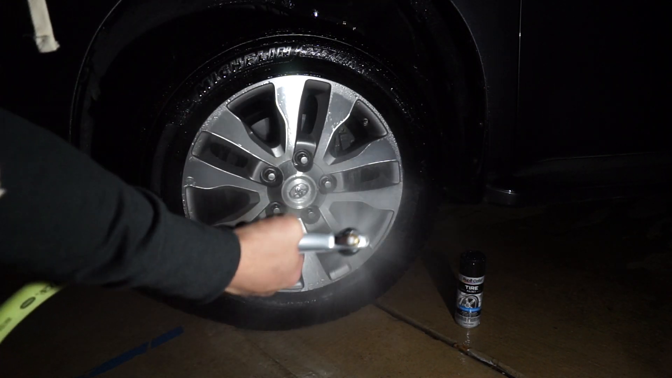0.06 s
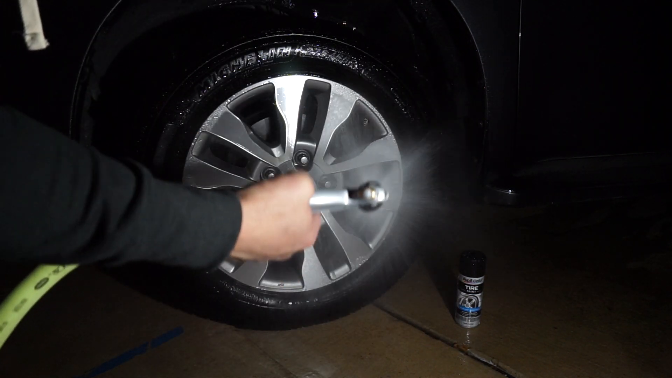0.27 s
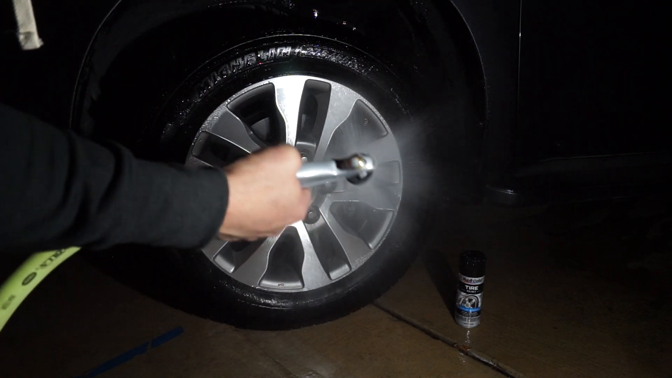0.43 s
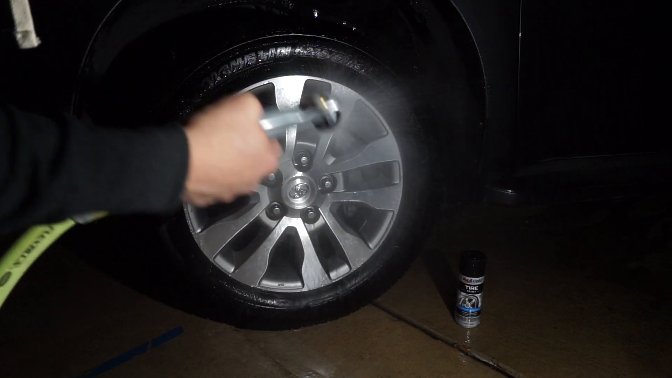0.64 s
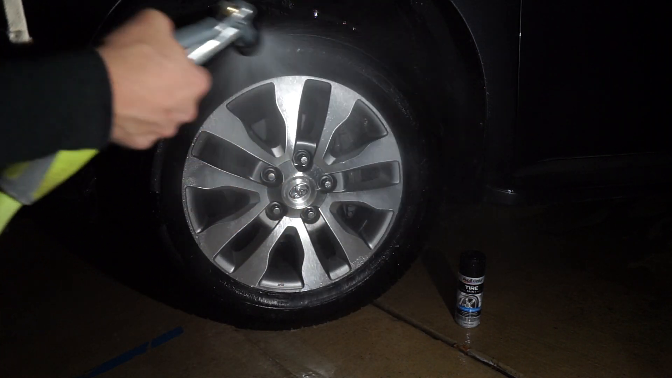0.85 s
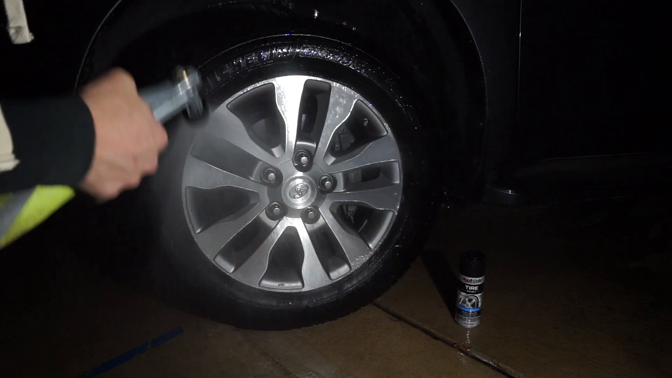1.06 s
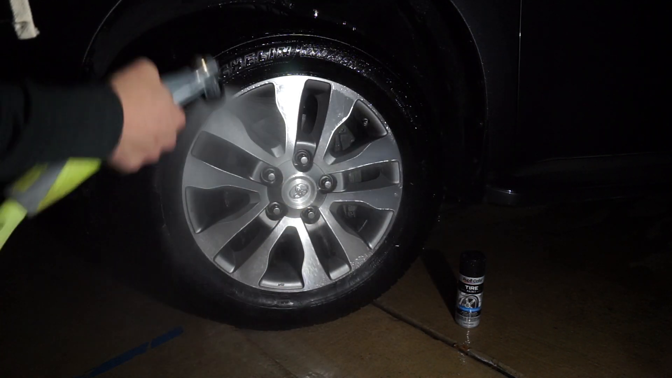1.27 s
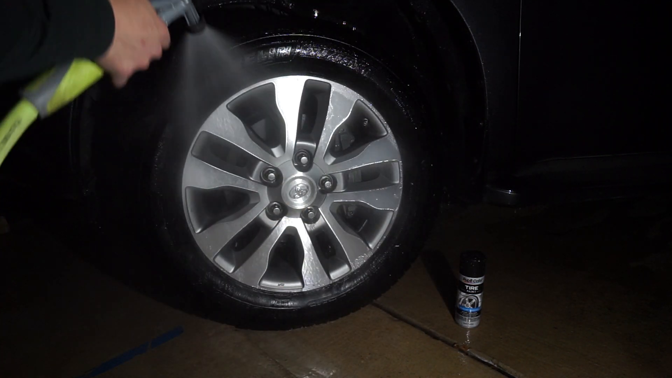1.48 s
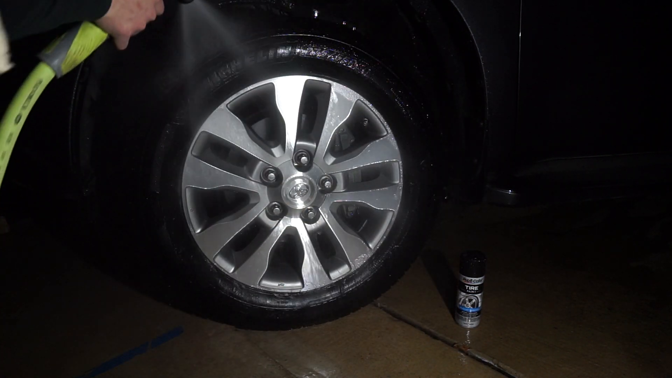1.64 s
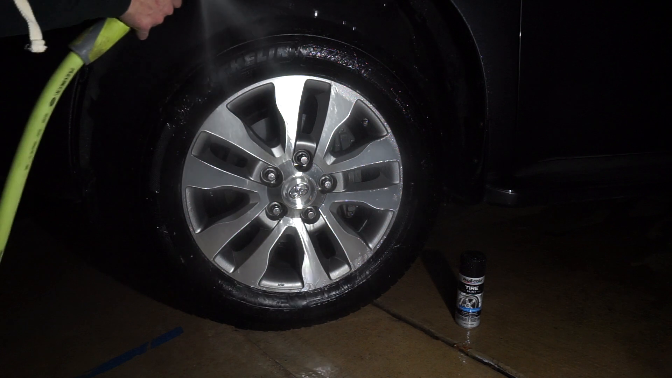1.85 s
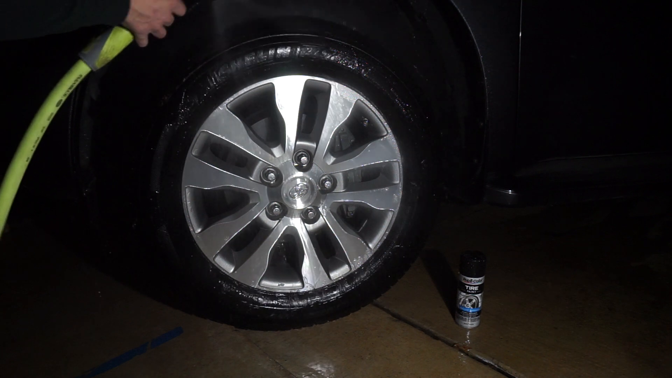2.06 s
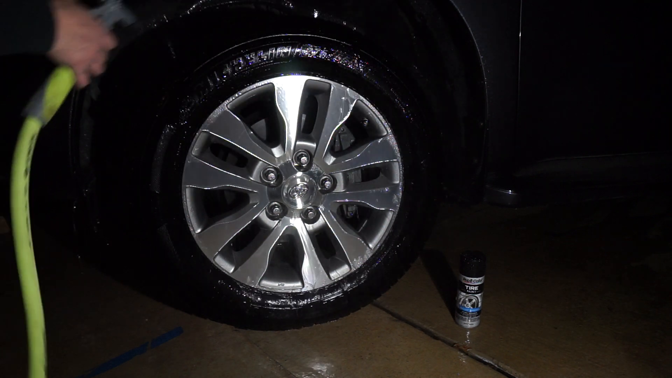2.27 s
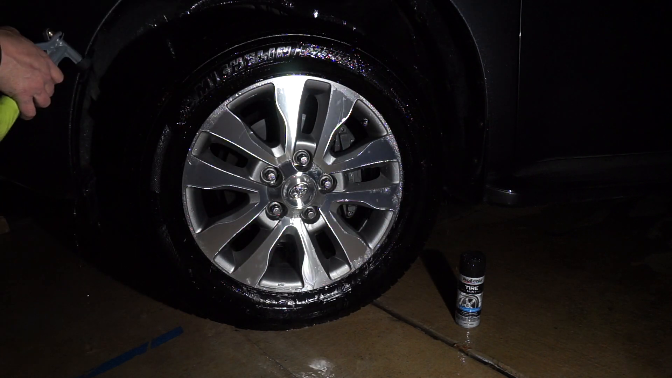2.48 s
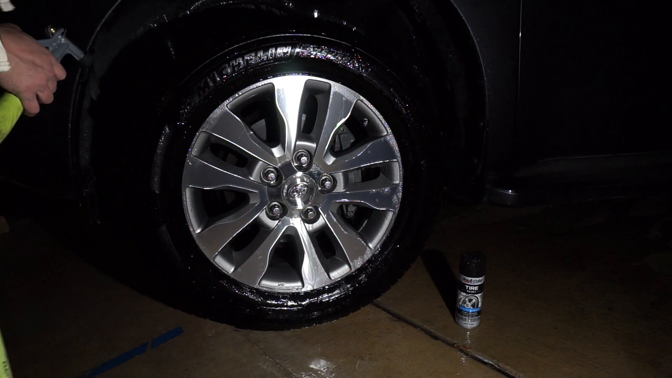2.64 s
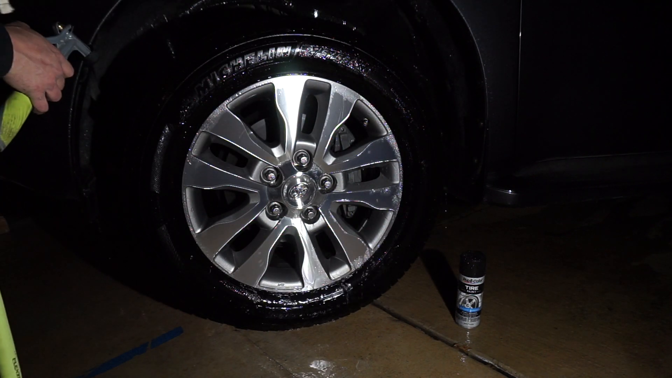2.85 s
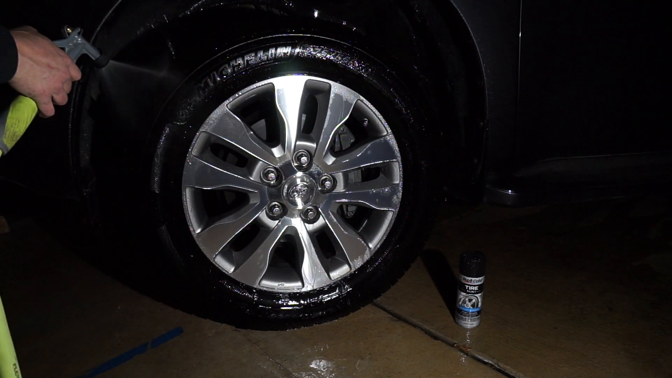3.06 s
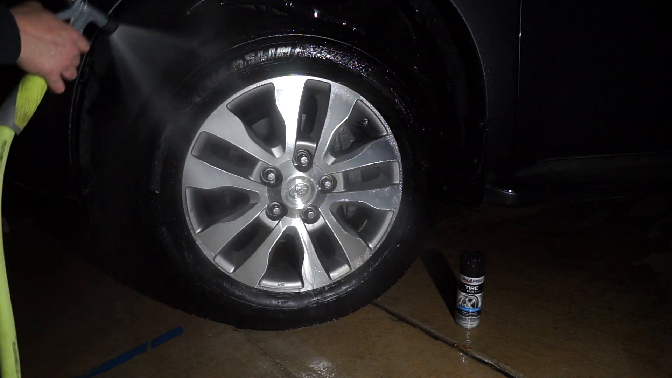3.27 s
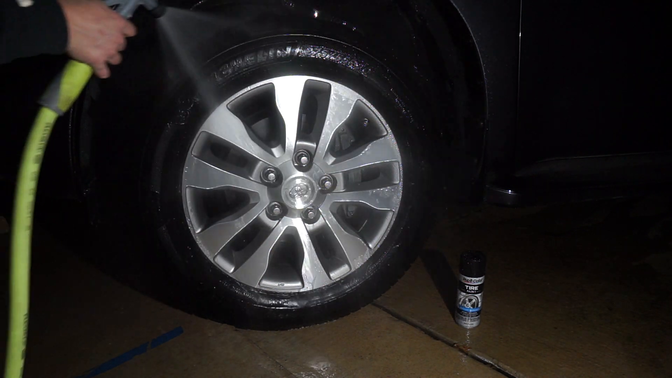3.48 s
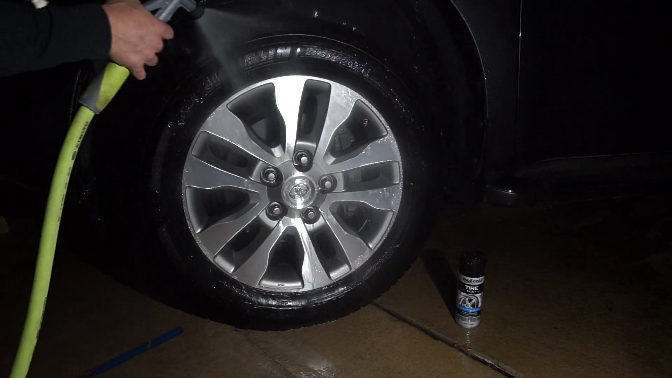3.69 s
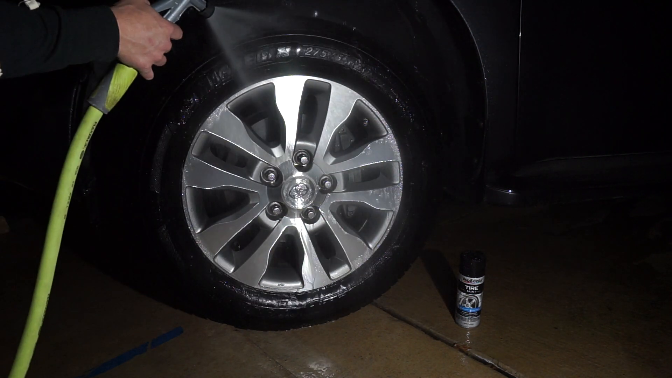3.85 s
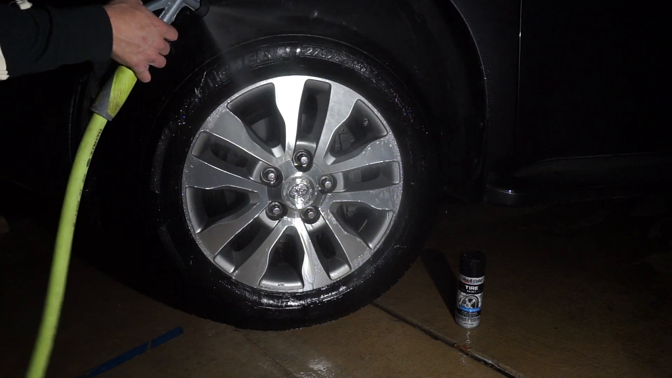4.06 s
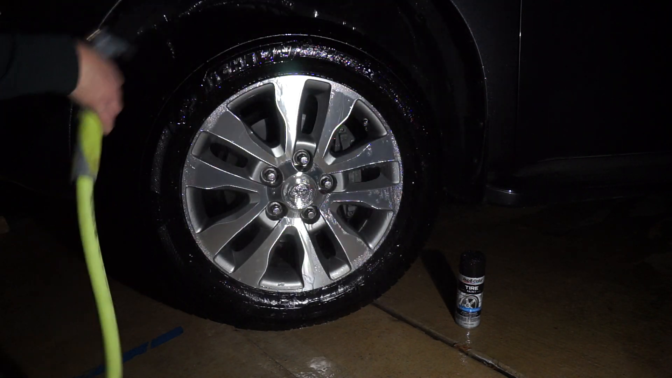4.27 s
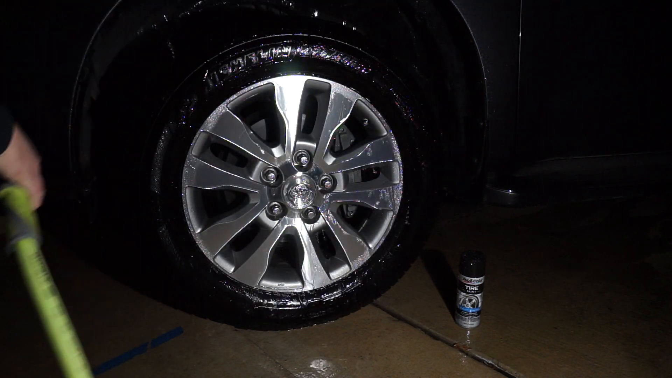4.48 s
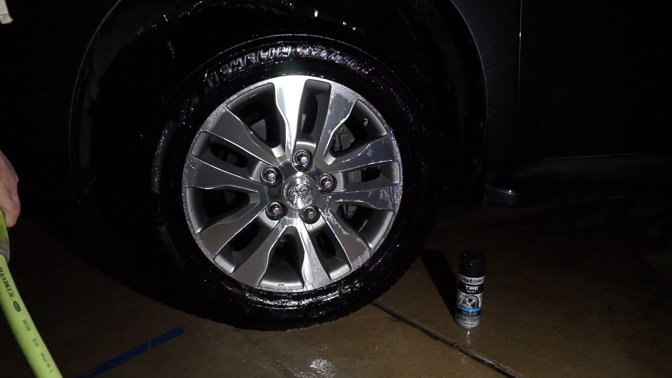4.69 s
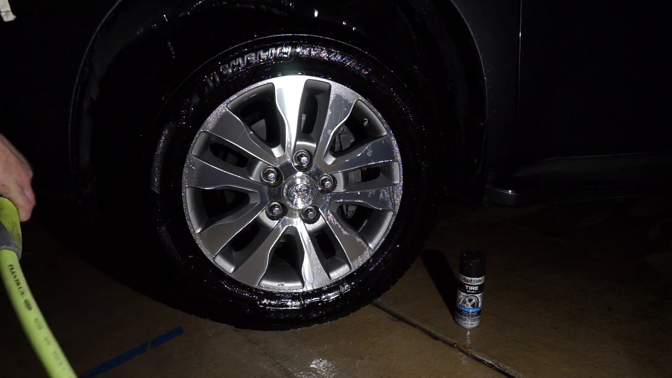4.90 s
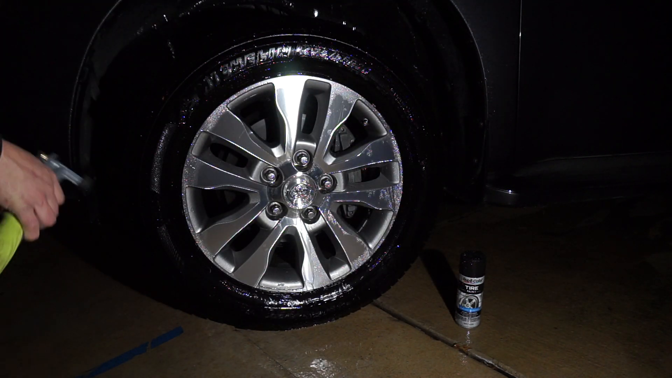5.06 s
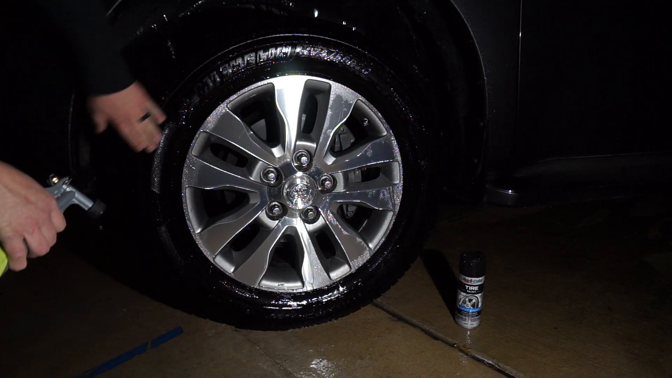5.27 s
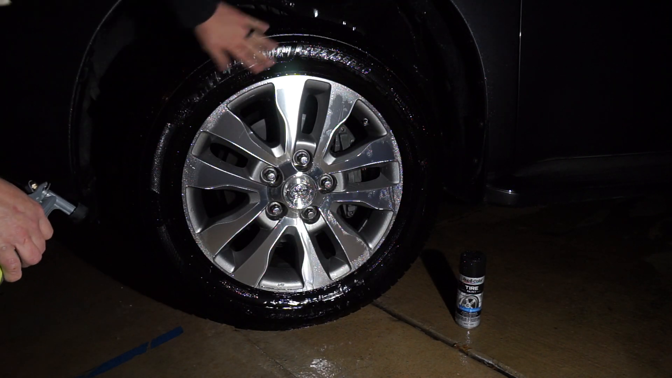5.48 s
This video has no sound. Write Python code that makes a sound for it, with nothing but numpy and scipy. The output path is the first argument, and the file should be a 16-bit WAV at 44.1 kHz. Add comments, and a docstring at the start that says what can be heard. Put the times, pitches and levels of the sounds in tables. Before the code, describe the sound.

In an echoing garage with a low hum, water hisses from a hose nozzle close to the microphone and patters against an alloy wheel for about two seconds. It cuts off, leaving small pops, ticks and drips. After a light trigger click, the spray returns for about a second, drumming on the tyre with a wavering ring from the wheel arch. Water drips again, and a sleeve gives a brief, zipping swish.

```python
"""In an echoing garage with a low hum, a hose nozzle already sprays a car wheel: broadband turbulence
hisses, and random droplet impacts patter on the alloy rim and excite the modes of its hollow and spokes.
The jet stops; water runs off, bubble pops and bright ticks ring briefly, drips chirp upward on wet concrete.
The trigger clicks; a second spray drums on the tyre and rings the wheel arch in a nearly pure tone.
Water drips again, and at the end a sleeve swishes as friction grains and a zip of weave ribs."""
import sys
import numpy as np
from scipy import signal
from scipy.fft import rfft, irfft, next_fast_len
from scipy.io import wavfile

SR = 44100
rng = np.random.default_rng(int(sys.argv[2]) if len(sys.argv) > 2 else 0)


def materialize(psi):
    """Save the field psi as 16-bit PCM at rate SR to the path in sys.argv[1].

    A 1-D psi becomes a single channel; in a 2-D psi each row is a channel.
    """
    bounded = np.clip(np.atleast_2d(psi).T, -1, 1)
    quanta = np.round(bounded * 32767).astype(np.int16)
    wavfile.write(sys.argv[1], SR, quanta)


N = 243927

# trigger of the nozzle: (starts to open [s], starts to close [s], rim patter with the jet square on [dB])
SPRAYS = [(-0.2, 2.087, -24.5), (3.051, 4.093, -28.5)]


def from_db(db):
    """Amplitude gain is ten to the power of a twentieth of the decibels."""
    return 10 ** (np.asarray(db) / 20)


def pan(db):
    """A level difference, left minus right, is shared equally between the channels."""
    return from_db(db * np.array([[.5], [-.5]]))


def rms_one(x):
    """Dividing by the root mean square gives unit power."""
    return x / np.sqrt(np.mean(x ** 2) + 1e-20)


def in_time(rows):
    """Linear interpolation gives each column of a curve at every sample."""
    s, *columns = np.transpose(rows)
    return [np.interp(np.arange(N) / SR, s, column) for column in columns]


def at_hz(points, hz):
    """Interpolation on a log-frequency axis reads a table at any frequency."""
    f, value = np.transpose(points)
    return np.interp(np.log(hz + 1), np.log(f), value)


def drift(rate):
    """Interpolated random knots, rate per second, make a slow fluctuation."""
    knots = rng.standard_normal(4000)
    return np.interp(np.arange(N) / SR * rate, np.arange(len(knots)), knots)


def swell(s, db, sigma_s):
    """A Gaussian envelope raises and lowers the gain around one moment."""
    return from_db(db) * np.exp(-.5 * ((np.arange(N) / SR - s) / sigma_s) ** 2)


def delayed(x, seconds):
    """Travel time shifts a signal without changing its shape."""
    return np.interp(np.arange(N) - seconds * SR, np.arange(N), x)


def colour(x, spectrum):
    """Folding the cepstrum gives the causal minimum-phase filter of a spectrum; unit power."""
    hz = np.fft.rfftfreq(2 ** 13, 1 / SR)
    cepstrum = irfft(np.log(from_db(at_hz(spectrum, hz))))
    cepstrum[1:len(hz) - 1] *= 2
    cepstrum[len(hz):] = 0
    response = irfft(np.exp(rfft(cepstrum)))
    return rms_one(signal.oaconvolve(x, response[None], axes=1)[:, :N])


def spread(mid, side):
    """Interchannel correlation set by frequency: alike in the bass, least alike near 6 kHz."""
    # likeness of the channels: (frequency [Hz], correlation [1])
    likeness = [(100, 1), (350, 0.95), (700, 0.88), (1400, 0.72), (2900, 0.7), (3700, 0.42), (5000, 0.21),
                (6200, 0.14), (7200, 0.42), (8500, 0.75), (15000, 0.57)]
    size = next_fast_len(len(mid))
    alike = np.clip(at_hz(likeness, np.fft.rfftfreq(size, 1 / SR)), -.99, .995)
    common = np.sqrt(1 + alike) * rfft(mid, size)
    opposed = np.sqrt(1 - alike) * rfft(side, size) * [[1], [-1]]
    return irfft(common + opposed, size)[:, :len(mid)] / np.sqrt(2)


def droplets(per_s, size_db, clump_db, clump_rate):
    """Random impulses are impacts of uneven size, in clumps, each at its own place; unit power."""
    hits = (rng.random(N) < per_s / SR) * rng.choice([-1, 1], N)
    sizes = size_db * np.clip(rng.standard_normal(N), -2, 2)
    hits = hits * from_db(sizes + clump_db * drift(clump_rate))
    return rms_one(spread(hits, hits * rng.standard_normal(N)))


def resonate(x, modes):
    """Modal superposition: parallel two-pole resonances of alternating sign; unit power."""
    out = 0
    for k, (hz, width, db) in enumerate(modes):
        r = np.exp(-np.pi * width / SR)
        poles = [1, -2 * r * np.cos(2 * np.pi * hz / SR), r * r]
        mode = (1 - r * r) * signal.lfilter([1, 0, -1], poles, x)
        out = out + (-1) ** k * from_db(db) * mode
    return rms_one(out)


def hum(level_db=-52.5):
    """Stationary coloured noise fills the garage as a steady low rumble."""
    # spectrum: (frequency [Hz], level per Hz [dB])
    rumble = [(20, -29), (45, -13), (70, -8), (100, -4.5), (125, 0.5), (175, -2), (230, -8), (310, -6),
              (420, -13.5), (750, -16.5), (1000, -18), (1500, -24), (3000, -31), (6000, -42), (16000, -35)]
    return from_db(level_db) * colour(spread(*rng.standard_normal((2, N))), rumble)


def garage(x, first_echo_s=0.0045):
    """Diffuse reverberation off concrete: dense echoes decay exponentially, the top treble fastest."""
    # reverberation: (frequency [Hz], time to fall by 60 dB [s])
    decay = [(125, 0.83), (500, 0.93), (2000, 0.51), (5000, 0.69), (10000, 0.36), (16000, 0.26)]
    hz, t, cells = signal.stft(spread(*rng.standard_normal((2, SR))), SR)
    t60 = at_hz(decay, hz)[:, None]
    tail = signal.istft(cells * from_db(-60 * t / t60), SR)[1]
    # the echoes fade in around the first one
    tail = tail * np.clip(np.arange(tail.shape[1]) / SR / first_echo_s - .5, 0, 1)
    tail /= np.sqrt(np.sum(tail ** 2) / 2)
    return signal.fftconvolve(x.mean(axis=0)[None], tail, axes=1)[:, :N]


def wandering(x, wander_s=0.0007, rate=5.0):
    """A changing path length varies the delay to the walls as the hand moves."""
    read = np.arange(N) - wander_s * SR * drift(rate)
    return x[:, np.clip(read, 0, N - 1).astype(int)]


def handling():
    """Friction as random grains: shoe and hand scuffs and a sleeve's swish under short swells."""
    # sleeve spectrum: (frequency [Hz], level per Hz [dB])
    sleeve = [(590, -46), (1000, -21), (1200, -15), (1890, -12), (2310, -14), (2500, -11), (2910, -21),
              (3380, -5), (4210, -13), (5440, -7.5), (7700, -20), (11300, -5), (16000, -13)]
    # the arm reaches for the tyre: (time [s], level [dB], bell sigma [s])
    swishes = [(5.43, -51, 0.04), (5.468, -37, 0.03), (5.53, -40, 0.007)]
    # shoes and hand: (time [s], level [dB], bell sigma [s], frequency [Hz], width [Hz], pitch glide [1/s])
    scuffs = [(2.637, -50, 0.011, 880, 700, 0.5), (2.666, -50, 0.011, 730, 600, 0),
              (2.723, -56, 0.043, 850, 1100, 1), (4.392, -44, 0.016, 120, 50, -5),
              (5.253, -57, 0.01, 960, 400, -4), (5.113, -63, 0.028, 2030, 500, 3.5),
              (5.424, -49, 0.0065, 1590, 300, -1), (5.527, -37.5, 0.0045, 2480, 300, -1)]
    t = np.arange(N) / SR
    grains = droplets(9000, size_db=2.0, clump_db=3.0, clump_rate=200)
    grit = droplets(1500, size_db=2.0, clump_db=2.5, clump_rate=200)
    out = sum(swell(*swish) for swish in swishes) * colour(grains, sleeve) * pan(4)
    for s, db, sigma_s, hz, width, glide in scuffs:
        mode = [(hz, width, 0)]
        rub = resonate(resonate(grit, mode), mode)
        # a quadratic time warp makes the pitch glide
        warped_t = t + glide * (t - s) ** 2 / 2
        out += swell(s, db, sigma_s) * [np.interp(warped_t, t, channel) for channel in rub]
    return out


def weave(rough=0.03, jitter_rate=500, flicker_db=3.0, flicker_rate=110):
    """Periodic friction: ribs of the sleeve rub in a rough, flickering zip that follows the arm's speed."""
    # passing ribs: (time [s], rib rate [1/s])
    ribs = [(5.42, 1700), (5.452, 1950), (5.468, 1850), (5.482, 1720), (5.5, 1580), (5.53, 1420)]
    # multiples of the rib rate from the first: (level [dB])
    harmonics = [-3, -1, 3, -6]
    ribs_hz, = in_time(ribs)

    def rubbing():
        turns = np.cumsum(ribs_hz * (1 + rough * drift(jitter_rate))) / SR
        return sum(from_db(db + flicker_db * drift(flicker_rate)) * np.sin(2 * np.pi * k * turns)
                   for k, db in enumerate(harmonics, 1))

    return swell(5.485, -45, 0.032) * rms_one(spread(rubbing(), rubbing()))


def short_rings(faint_db=-57, spread_db=4.0, faint_hz=2700, spread_octaves=0.44, count=110):
    """Damped oscillation, rising in pitch; faint random bubble pops lie among clear pops, ticks and a click."""
    # clear short rings: bubble pops, bright ticks of drips, and the click of the trigger at 3.074 s:
    # (time [s], level [dB], frequency [Hz])
    clear = [(2.318, -42, 4260), (2.351, -42, 2550), (2.385, -38, 13100), (2.42, -44, 2510),
             (2.458, -43, 12500), (2.488, -45, 12000), (2.54, -42, 3200), (2.553, -44, 3700),
             (2.592, -41, 10200), (2.632, -47, 3450), (2.68, -46, 2900), (2.71, -47, 2450),
             (2.738, -49, 2300), (2.756, -41, 13500), (2.777, -41, 1850), (2.859, -45, 3400),
             (2.906, -46, 2900), (3.074, -46, 1850), (4.32, -43, 8000), (4.353, -49, 2810),
             (4.389, -40.5, 12300), (4.393, -44, 7700), (4.441, -48, 2710), (4.571, -56, 1870),
             (4.589, -53, 2340), (4.591, -49, 9500), (4.628, -48, 2400), (4.789, -58, 2600),
             (4.89, -53, 3600), (4.978, -27, 10900), (4.979, -45, 2940), (5.047, -50, 3200),
             (5.193, -53, 3300)]
    fade_cycles, rise = 6, 0.026  # cycles to fade by 1/e; share by which the pitch rises meanwhile
    times = rng.uniform(0, N / SR, count)
    chance = np.clip(rng.standard_normal((count, 2)), -2, 2)
    faint_levels = faint_db + spread_db * chance[:, 0]
    faint_pitches = faint_hz * 2 ** (spread_octaves * chance[:, 1])
    out, age = np.zeros(N + SR), np.arange(SR // 20) / SR
    for s, db, hz in [*clear, *zip(times, faint_levels, faint_pitches)]:
        faded = age * hz / fade_cycles
        ring = np.sin(2 * np.pi * hz * age * (1 + rise * faded / 2))
        at = int(s * SR)
        out[at:at + len(age)] += from_db(db) * np.exp(-faded) * ring
    return np.array([out[:N], out[:N]])


def runoff():
    """Sparse random impacts crackle as water drains, strongest just after each spray."""
    # spectrum: (frequency [Hz], level per Hz [dB])
    crackle = [(300, -20), (700, -7.5), (1200, -1.5), (1900, -3.5), (2600, -5.5), (4000, -12.5),
               (6500, -13.5), (10000, -12.5), (13500, -5.5), (16000, -19)]
    # puddle resonances: (frequency [Hz], width [Hz], level [dB])
    puddle_modes = [(770, 150, -5.5), (1014, 106, -1.5)]
    gush_db, gush_fall_db_per_s, trickle_db, puddle_db = -43.5, 75, -70, -68.5
    t = np.arange(N) / SR
    gush = sum((t > closes) * from_db(gush_db - gush_fall_db_per_s * np.abs(t - closes))
               for _, closes, _ in SPRAYS)
    dribble = swell(2.68, -64.5, 0.096)  # a pocket of water empties late
    water = gush + from_db(trickle_db) + dribble
    # the trickle patters into a puddle
    plops = droplets(70, size_db=2.5, clump_db=5.5, clump_rate=14)
    puddle = from_db(puddle_db) * resonate(plops, puddle_modes)
    return water * colour(droplets(110, size_db=6.0, clump_db=2.0, clump_rate=43), crackle) + puddle


def drips(spatter_db=1.0, plip_db=-4.5, bend=1.35, grain_db=6.5):
    """A rising chirp convolved with decaying noise: each plip is followed by an uneven spatter."""
    # drips on the wet floor: (time [s], level [dB], start frequency [Hz], end frequency [Hz],
    # plip length [s], left minus right [dB], spatter fade by 1/e [s])
    falls = [(2.504, -40.5, 2480, 13100, 0.0025, 1, .004), (2.773, -43, 1500, 5540, 0.0013, 2, 0.0045),
             (2.856, -41.5, 2180, 10300, 0.0057, -2, 0.0082), (2.876, -58, 4230, 10100, 0.0036, -5, .012),
             (2.901, -43, 2000, 10400, 0.0039, 1, .01), (4.476, -45, 7200, 15200, 0.00084, 3, .012),
             (4.707, -46.5, 2980, 13950, 0.003, 8, 0.017), (4.767, -46, 5950, 15000, 0.0013, 2, .006),
             (4.932, -44, 7000, 15000, 0.0012, 4, .006), (4.976, -31, 2240, 15600, 0.0013, -4, 0.0055),
             (5.123, -42.5, 7000, 12000, 0.0015, 6, 0.0046), (5.18, -48, 9000, 14000, .002, 0, .012),
             (5.273, -48, 6000, 15500, .001, 0, 0.0093), (5.308, -41.5, 2200, 11500, 0.004, 2, .006),
             (5.348, -52, 9000, 14500, .001, 0, .004)]
    out, after = np.zeros((2, N)), np.arange(SR // 12) / SR
    for s, db, start_hz, end_hz, length, pan_db, fade_s in falls:
        age = np.arange(int(length * SR)) / SR
        hz = start_hz + (end_hz - start_hz) * (age / length) ** bend
        plip = np.sin(2 * np.pi * np.cumsum(hz) / SR) * signal.windows.tukey(len(age), .25)
        grains = from_db(grain_db * np.minimum(rng.exponential(1, len(after)), 5))
        sizes = np.exp(-after / fade_s) * grains
        spatter = spread(*rng.standard_normal((2, len(after))) * sizes)
        spatter = spatter * from_db(spatter_db) / np.linalg.norm(sizes)
        spatter[:, 0] += from_db(plip_db)  # the plip itself comes first
        splash = signal.fftconvolve(plip[None], spatter, axes=1)
        at = int(s * SR)
        out[:, at:at + splash.shape[1]] += from_db(db) * pan(pan_db) * splash
    return out


def drone(wander=0.0042, wander_rate=8, flutter_db=2.5, flutter_rate=30):
    """Sustained excitation: the jet keeps the arch's main mode ringing in a nearly pure, swaying tone."""
    # ringing of the main mode: (time [s], level [dB])
    arch_ring = [(3.37, -56), (3.38, -63), (3.45, -36), (3.52, -46), (3.564, -32), (3.634, -41),
                 (3.68, -27), (3.71, -47), (3.842, -30.5), (3.882, -44), (3.968, -30.5), (3.994, -44),
                 (4.164, -37), (4.27, -59)]
    mode_hz = 351
    s, db = np.transpose(arch_ring)
    level_db = np.interp(np.arange(N) / SR, s, db, left=-200, right=-200)
    turns = np.cumsum(mode_hz * (1 + wander * drift(wander_rate))) / SR
    tone = np.sqrt(2) * np.sin(2 * np.pi * turns)
    return tone * from_db(level_db + flutter_db * drift(flutter_rate)) * pan(3.5)


def valve(opens, closes):
    """Valve law: the flow of one spray grows with the square of the valve's travel."""
    t = np.arange(N) / SR
    open_s, close_s = 0.092, 0.078  # travel times
    travel = np.minimum((t - opens) / open_s, 1 - (t - closes) / close_s)
    return np.clip(travel, 0, 1) ** 2


def tyre_and_arch(drumming):
    """Impact excitation: heavy drops drum on the tyre and ring the arch's modes; returns both."""
    # strike of the jet on the tyre: (time [s], level [dB])
    strike = [(0.02, -49), (2.03, -50), (2.06, -53), (3.2, -83), (3.398, -57), (3.43, -38), (3.462, -36),
              (3.512, -41.5), (3.578, -32.5), (3.976, -33), (3.996, -44), (4.11, -34.5), (4.2, -39),
              (4.27, -58)]
    # tyre spectrum: (frequency [Hz], level per Hz [dB])
    tyre_spectrum = [(20, -51), (35, -10), (50, -10), (75, -10), (125, -4), (190, -0.5), (255, 4.5),
                     (315, -1), (390, -2), (460, -1.5), (700, -9), (1200, -4.5), (3000, -34.5)]
    # arch resonances: (frequency [Hz], width [Hz], level [dB])
    arch_modes = [(258, 52, -1.5), (285, 7.3, 5), (571, 31, 0.5), (661, 15, -7)]
    square_db, arch_follows = -41.5, 0.9  # below this strike the arch's share fades (dB per dB)
    drum_db = in_time(strike)[0]
    arch_db = drum_db + arch_follows * np.minimum(drum_db - square_db, 0)
    heavy = droplets(2500, size_db=1.5, clump_db=2.0, clump_rate=45)
    tyre = drumming * from_db(drum_db) * colour(heavy, tyre_spectrum)
    on_arch = droplets(2500, size_db=2.5, clump_db=4.0, clump_rate=30)
    arch = drumming * from_db(arch_db - 5.0) * resonate(on_arch, arch_modes)
    return tyre, arch


def rim(landing, pattering):
    """Impact excitation: drops patter on the alloy and ring the modes of its hollow and spokes."""
    # strike of the jet on the rim: (time [s], level [dB])
    strike = [(0.02, -35), (0.15, -38), (0.21, -34.5), (0.54, -33), (0.56, -38), (0.92, -39.5),
              (1.4, -33.5), (1.74, -48), (2.06, -47), (3.17, -53.5), (3.61, -33.5), (3.692, -41.5),
              (3.86, -33.5), (3.99, -44.5), (4.1, -34.5)]
    # patter spectrum: (frequency [Hz], level per Hz [dB])
    patter_spectrum = [(100, -38.5), (300, -9), (550, -5), (1100, -3.5), (1500, 0), (2000, -1), (2500, 0.5),
                       (3300, -1.5), (4200, -4), (4900, -5.5), (8000, -11.5), (15000, -34)]
    # resonances of the hollow: (frequency [Hz], width [Hz], level [dB])
    hollow_modes = [(668.4, 20, 0), (734, 50, -1.5), (853, 110, -5.5), (1057, 51, -15)]
    # resonances of the spokes: (frequency [Hz], width [Hz], level [dB])
    spoke_modes = [(2100, 560, -3), (2455, 130, 2), (3130, 150, -4.5), (3730, 400, -5), (4050, 300, -5.5)]
    # the jet sweeps over the spokes: (time [s], level [dB], bell sigma [s])
    spoke_passes = [(0.128, -31, 0.1), (0.44, -34.5, 0.17), (1.2, -41, 0.2), (1.933, -39, 0.12)]
    patter_follows, hollow_follows = 0.31, 1.8  # dB per dB of the strike
    strike_db = in_time(strike)[0] + 33  # 0 dB when the jet is square on the rim
    taps = droplets(9000, size_db=2.5, clump_db=0.7, clump_rate=150)
    patter = pattering * from_db(patter_follows * strike_db) * colour(taps, patter_spectrum)
    on_hollow = droplets(4000, size_db=5.0, clump_db=-0.5, clump_rate=29)
    hollow = landing * from_db(hollow_follows * strike_db - 33.0) * resonate(on_hollow, hollow_modes)
    on_spokes = droplets(5000, size_db=5.5, clump_db=1.5, clump_rate=35)
    passing = sum(swell(*sweep) for sweep in spoke_passes)
    spokes = landing * passing * resonate(on_spokes, spoke_modes)
    # the spokes hardly ring above 4500 Hz
    spokes = signal.sosfilt(signal.butter(6, 4500, fs=SR, output="sos"), spokes)
    return patter + hollow + spokes


def spitting(flow):
    """Intermittent flow: the nozzle spits coarse drops as it closes, and as it opens and a while after."""
    # spectrum: (frequency [Hz], level per Hz [dB])
    spit_spectrum = [(1500, -29), (3000, 4.5), (4500, 4), (7500, 6), (10000, -5), (15000, -1)]
    # spits: (time [s], level [dB], hold [s], release [dB/s])
    spits = [(2.083, -29, 0.006, 702), (3.121, -33, 0.004, 605), (3.15, -30, 0.025, 300),
             (3.234, -31, 0.11, 81)]
    attack_db_per_s = 598
    t = np.arange(N) / SR
    gain = sum(from_db(db - attack_db_per_s * np.maximum(s - t, 0) - release * np.maximum(t - s - hold, 0))
               for s, db, hold, release in spits)
    coarse = droplets(5000, size_db=3.0, clump_db=2.5, clump_rate=130)
    return np.sqrt(flow) * gain * colour(coarse, spit_spectrum)


def mist(flow, mist_db, mic_lag_s=9e-6):
    """Dense random impulses fuse into broadband hiss; a later right channel gives a time difference."""
    # spectrum: (frequency [Hz], level per Hz [dB])
    mist_spectrum = [(1500, -37), (4000, -7), (6200, -10), (8000, -4.5), (10000, 0.5), (12500, 2),
                     (14500, 1), (16000, -5)]
    fine = droplets(26000, size_db=5.0, clump_db=1.0, clump_rate=280)
    left, right = flow * from_db(mist_db + 3.0) * colour(fine, mist_spectrum)
    lag = np.exp(-2j * np.pi * np.fft.rfftfreq(N, 1 / SR) * mic_lag_s)
    return np.array([left, irfft(rfft(right) * lag, N)])


def spray(flight_s=0.0081, drum_lag_s=0.13, tyre_pan_db=1.5):
    """Time of flight: mist hisses at the nozzle, heavier drops land later on rim, tyre and arch."""
    # hiss as the hand moves the nozzle: (time [s], level [dB], left minus right [dB])
    nozzle = [(0.02, -27.5, 0.5), (0.71, -26, 1), (0.87, -24.5, 2), (1.24, -28.5, 2), (1.48, -25, 1.5),
              (1.63, -29, 4), (1.65, -26, 4), (1.81, -27.5, 2), (2.08, -23.5, 2.5), (3.15, -28, 3.5),
              (3.224, -30, 2), (3.398, -29.5, 5), (3.844, -25.5, 2), (3.998, -27, 2.5), (4.1, -24, 2)]
    mist_db, pan_db = in_time(nozzle)
    flow = sum(valve(opens, closes) for opens, closes, _ in SPRAYS)
    rim_flow = sum(from_db(db) * valve(opens, closes) for opens, closes, db in SPRAYS)
    landing, pattering = delayed(flow, flight_s), delayed(rim_flow, flight_s)
    tyre, arch = tyre_and_arch(delayed(flow, drum_lag_s))
    moving = mist(flow, mist_db) + spitting(flow) + rim(landing, pattering) + arch
    return moving * pan(pan_db) + tyre * pan(tyre_pan_db)


def scene(spray_room_db=-8, drip_room_db=3, near_room_db=-8, drip_direct_db=-1, drip_db=-2.5):
    """Direct-to-reverberant ratio sets distance: spray, rings and sleeve near, drips mostly by the room."""
    jet = spray()
    water = from_db(drip_db) * drips() + runoff()
    near = handling() + weave() + short_rings()
    to_room = from_db(spray_room_db) * wandering(jet)
    to_room = to_room + from_db(drip_room_db) * water + from_db(near_room_db) * near
    direct = jet + drone() + from_db(drip_direct_db) * water + near
    return from_db(-0.95) * (direct + garage(to_room)) + hum()


def record(dry):
    """Port resonance makes the right microphone lag in phase from 3 to 7 kHz; the top is cut steeply."""
    # phase lag of the right port: (frequency [Hz], lag [rad])
    port_lag = [(2670, 0.01), (3400, 0.63), (4400, 1.44), (5170, 1.5), (5900, 2.1), (7000, 0.01)]
    size, cutoff_hz = 2 ** 18, 15900
    lag = at_hz(port_lag, np.fft.rfftfreq(size, 1 / SR))
    right = irfft(rfft(dry[1], size) * np.exp(-1j * lag))[:N]
    low_pass = signal.ellip(12, .1, 80, cutoff_hz, fs=SR, output="sos")
    return signal.sosfilt(low_pass, [dry[0], right])


dry = scene()
out = record(dry)
materialize(out)
```